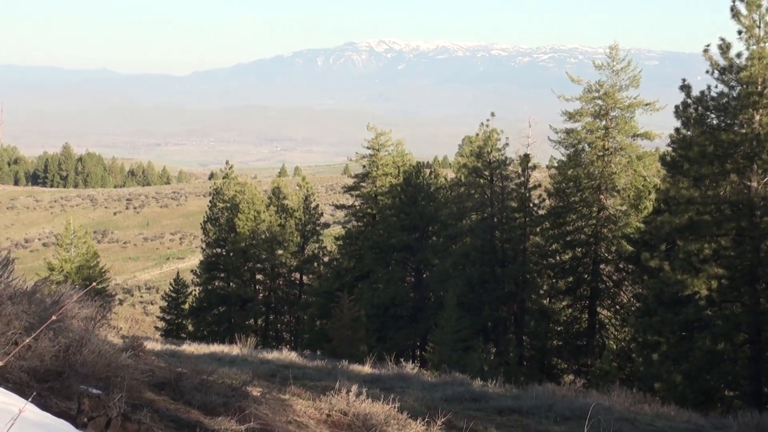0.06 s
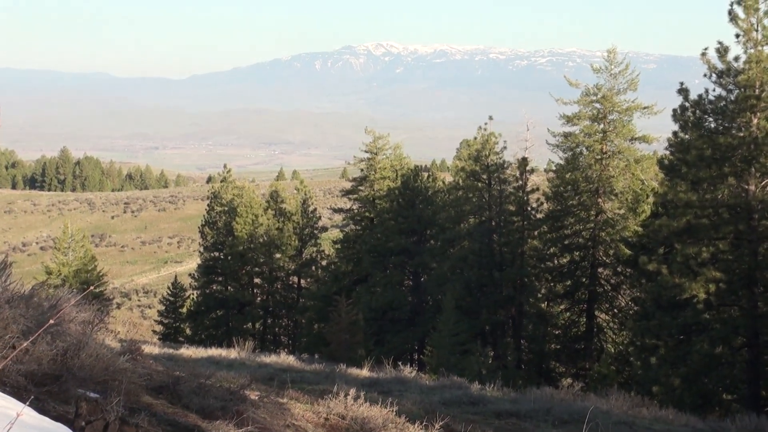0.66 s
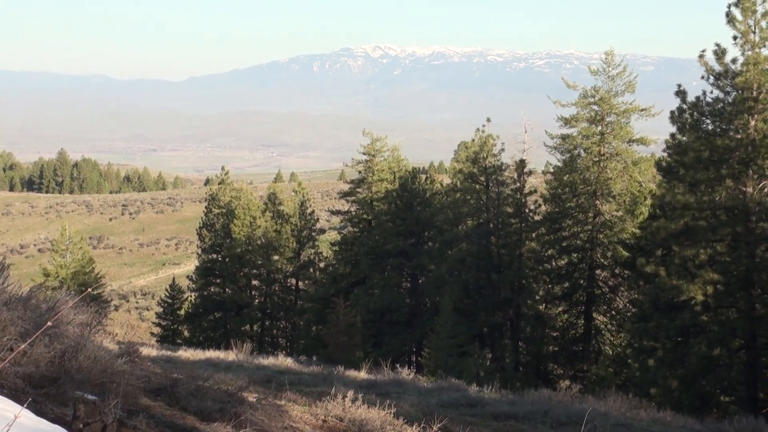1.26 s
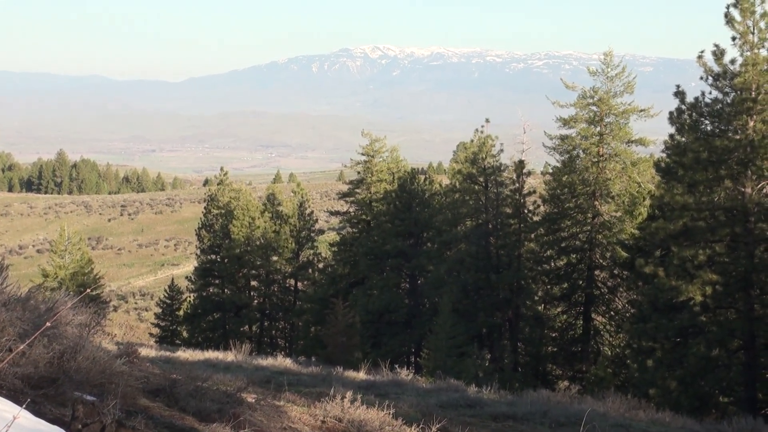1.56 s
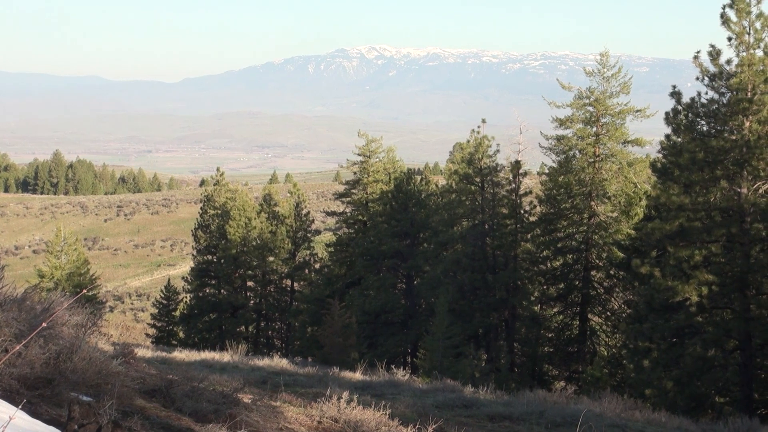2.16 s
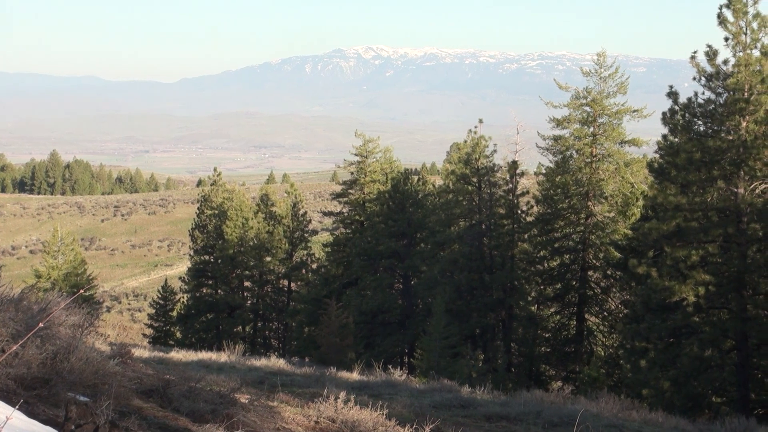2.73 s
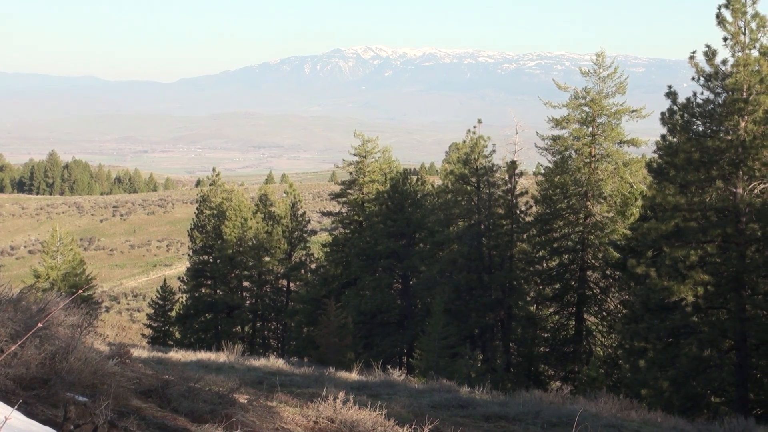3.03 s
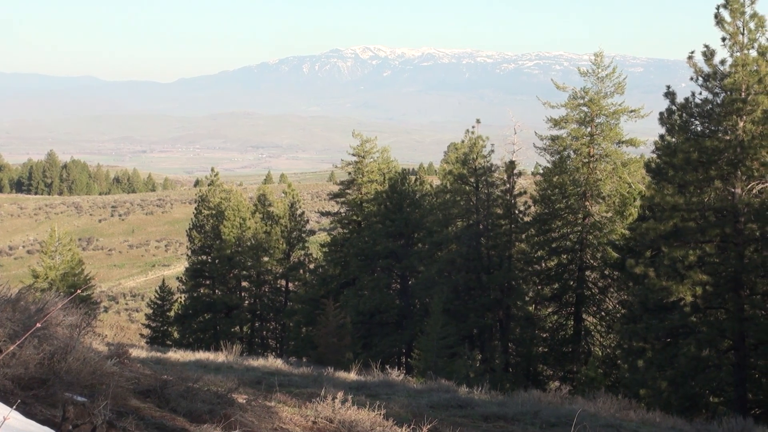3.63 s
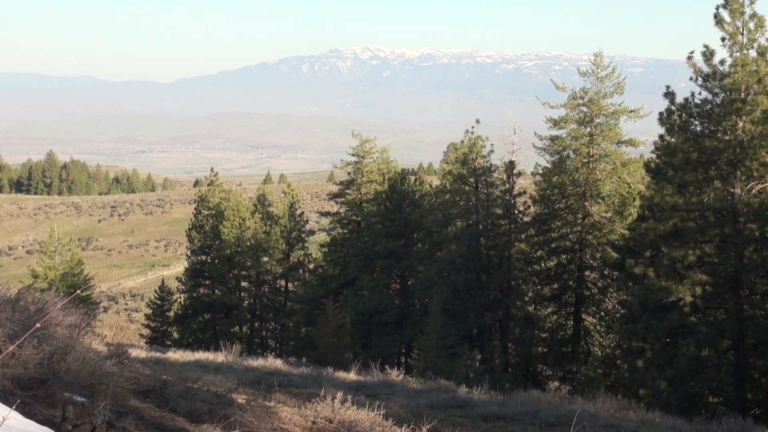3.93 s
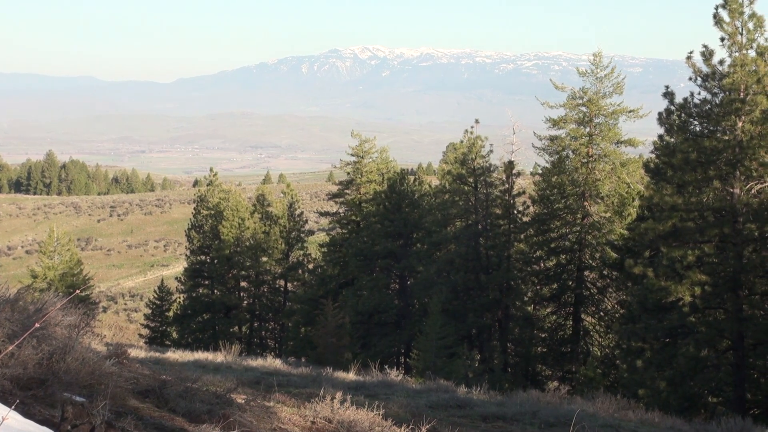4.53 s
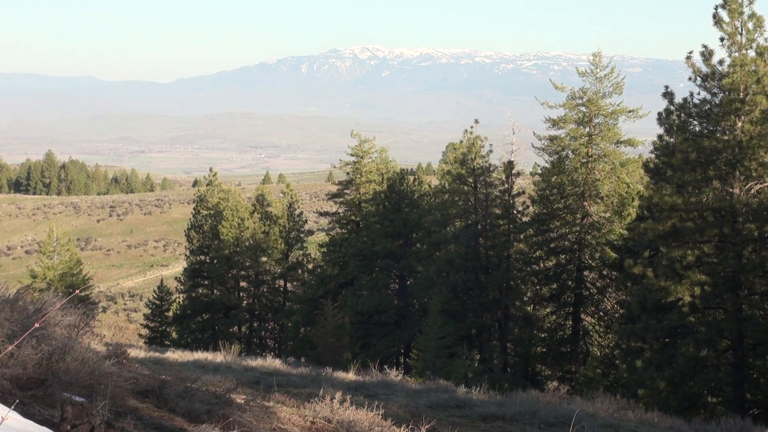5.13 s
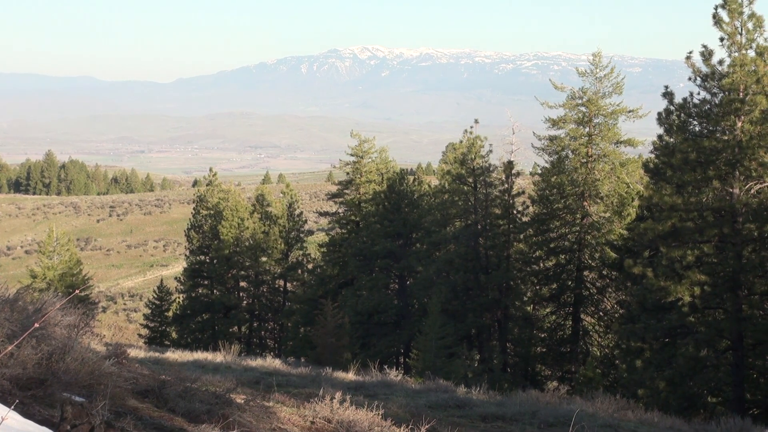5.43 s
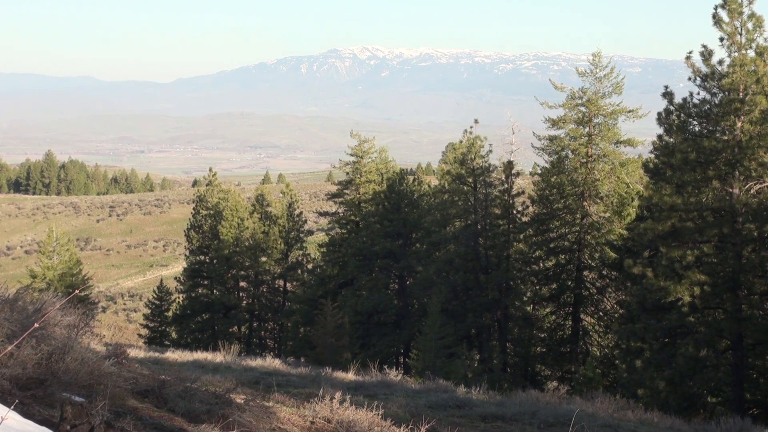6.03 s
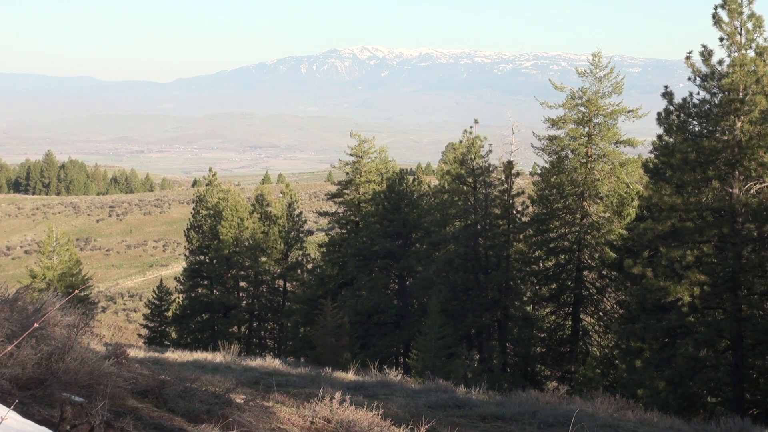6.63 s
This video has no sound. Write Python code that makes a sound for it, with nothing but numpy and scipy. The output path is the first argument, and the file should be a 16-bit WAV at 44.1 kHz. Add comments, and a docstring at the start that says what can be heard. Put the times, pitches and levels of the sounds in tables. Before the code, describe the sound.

Two distant wild turkeys gobble one after the other while small birds whistle and chirp, with low wind rumble and handling knocks on the microphone.

```python
"""Two wild turkeys gobble on a wooded hillside, the second deeper among the trees.
Each gobble is a fast rattle of high yelps and low notes, scattered into echoes by the trunks.
A small songbird whistles two phrases of falling notes, and others chirp farther off.
A gust rumbles on the microphone and dies; light handling knocks, ticks and scuffs
sound over quiet air and hiss."""
import sys
import numpy as np
from scipy import signal
from scipy.fft import rfft, irfft
from scipy.io import wavfile
from scipy.ndimage import uniform_filter1d

SR = 44100
rng = np.random.default_rng(int(sys.argv[2]) if len(sys.argv) > 2 else 0)


def generate_wav(sig):
    """Save sig (samples, or channels by samples) to the path in sys.argv[1] as 16-bit PCM at SR."""
    pcm = np.round(np.clip(np.atleast_2d(sig).T, -1, 1) * 32767).astype(np.int16)
    wavfile.write(sys.argv[1], SR, pcm)


N = 303849
TIME = np.arange(N) / SR

# The near gobble's syllables. Each row: start in seconds, length in seconds, low note's level in dB,
# its slide as a share of its pitch (minus falls), yelp's level in dB, yelp's pitch in Hz.
SYLLABLES = [(4.13, 0.046, -49.5, 0.021, -56, 1196), (4.17, .044, -40.5, 0.0027, -52, 1270),
             (4.217, .02, -40.5, -0.084, -45.5, 1314), (4.24, 0.02, -54, 0.039, -55, 1445),
             (4.263, .036, -45.5, -0.099, -60, 1260), (4.328, 0.022, -44.5, -0.11, -52.5, 1180),
             (4.371, 0.021, -47.5, -0.024, -54, 1230), (4.392, .032, -43, 0.061, -57, 1394),
             (4.426, 0.034, -45, 0.075, -56, 1270), (4.475, .013, -47.5, -.12, -62, 1130),
             (4.503, 0.017, -48.5, -0.098, -61, 1120), (4.536, 0.03, -48.5, -0.082, -55, 1120),
             (4.591, .018, -56, -.02, -51, 1150), (4.623, 0.035, -42.5, 0.011, -52.5, 1190),
             (4.657, 0.023, -50, -0.032, -67, 1150), (4.721, 0.028, -48, 0.05, -53.5, 1080),
             (4.764, .032, -50, -0.015, -52.5, 1145), (4.801, 0.069, -49, -.02, -67, 1120),
             (4.924, 0.017, -49.5, -0.097, -56, 1057), (4.992, 0.059, -53, -0.035, -68, 1060)]


def near_turkey(yelp_lead_s=.014, yelp_rise=.064, lift_per_db=.003, rasp_db=-11):
    """A sinking rattle of yelps that break into low notes; air torn in the throat makes it hoarse."""
    voice = np.zeros(N)
    starts, _, low_dbs = np.transpose(SYLLABLES)[:3]
    for start, length, low_db, glide, yelp_db, yelp_hz in SYLLABLES:
        effort = 1 + lift_per_db * (low_db - low_dbs.mean())  # a louder note is pushed higher
        low_hz = np.interp(start, starts[[0, -1]], (690, 596)) * effort
        yelp = note(length, yelp_hz * (1 - yelp_rise), yelp_hz * (1 + yelp_rise), arch_hz=45, rough=.043)
        low = note(length, low_hz * (1 - glide), low_hz * (1 + glide),
                   arch_hz=45, rough=.043, overtone_db=-23)
        add(voice, start - yelp_lead_s, amp(yelp_db) * yelp)
        add(voice, start, amp(low_db) * low)
    puffs = np.maximum(voice, 0) * rng.standard_normal(N)  # one puff of air in each vibration
    rasp = colour(puffs, [(350, -30), (600, 27.5), (800, 2), (950, 10),
                          (1300, 9), (1550, 6), (2200, 2), (4000, -26)])
    hoarse = amp(1.7) * (voice + amp(rasp_db) * rasp)
    return forest(hoarse, t60=.5, wet_db=-9)


# How loud the far gobble is. Each row: time in seconds, low notes' level in dB, high notes' level in dB.
FAR_LEVELS = [(5.33, -61, -79), (5.385, -64, -49.5), (5.43, -62, -64), (5.5, -60.5, -52),
              (5.65, -54.5, -50), (6.02, -52, -50.5), (6.3, -58.5, -52.5), (6.6, -65.5, -61)]


def far_turkey(notes_per_s=32, glide=.12, high_start_hz=1305, sag_hz=350):
    """A rattle through more trees: low notes slide down, high notes slide up, and echoes blur them."""
    times, low_db, high_db = np.transpose(FAR_LEVELS)
    first, last = times[[0, -1]]
    low, high, top = np.zeros((3, N))
    for k, (low_slip, high_slip, bend, stray) in enumerate(rng.uniform(-1, 1, (60, 4))):
        start = first + k / notes_per_s
        if start < last:
            spent = (start - first) / (last - first)
            # the pitch sinks ever faster as the bird runs out
            hz = (high_start_hz - sag_hz * spent ** 1.7) * (1 + .059 * stray)
            low_hz = np.interp(start, [first, last], [675, 630]) * (1 + .05 * bend)
            add(low, start + .00822 * low_slip,
                note(.0216, low_hz * (1 + glide), low_hz * (1 - glide), rough=.039))
            add(high, start + .0073 * high_slip,
                note(.028, hz * (1 - glide), hz * (1 + glide), rough=.032))
            add(top, start + .008 * low_slip, note(.0264, low_hz * 2.6, low_hz * 2.9, rough=.063))
    out = np.zeros((2, N))
    fade = np.interp(TIME, [last, last + .23], [1, 0])
    for voice, db in ((low, low_db), (high, high_db), (top, low_db - 6.5)):
        scattered = forest(voice, t60=.55, wet_db=2)
        strength = np.sqrt(abs(uniform_filter1d(scattered[0] ** 2, size=5000)) + .022)
        out += scattered / strength * amp(np.interp(TIME, times, db)) * fade
    return out


# The whistled notes. Each row: start in seconds, length in seconds, pitch in Hz,
# dip in pitch during the note in Hz (minus bends up), level in dB.
SONG_NOTES = [(.45, 0.35, 4545, 112, -53), (0.884, 0.36, 4356, 105, -53.5), (1.355, 0.16, 3610, 8.5, -56),
              (1.582, 0.33, 3605, -52.5, -55), (4.08, 0.29, 4515, 87.5, -57),
              (4.505, .35, 4330, 97.5, -56.5), (4.973, 0.34, 4277, 74, -51.5),
              (5.425, 0.17, 3590, -0.5, -57.5), (5.656, 0.3, 3605, -60, -54.5)]


def songbird(attack_s=.048, release_s=.025, drift_hz=-14, swell_db_per_hz=.04):
    """Pure held whistles that bend away from their pitch and back, louder where they dip lower."""
    out = np.zeros(N)
    for start, length, hz, dip_hz, db in SONG_NOTES:
        progress = np.linspace(0, 1, int(length * SR))
        scoop = np.sin(np.pi * progress ** .666)
        pitch = hz - dip_hz * scoop + drift_hz * progress + 9 * waver(len(progress), 91.6)
        fade = np.minimum(1, length * np.minimum(progress / attack_s, (1 - progress) / release_s))
        swell_db = swell_db_per_hz * dip_hz * (scoop - scoop.mean())
        level = fade * amp(db + swell_db + 2.4 * waver(len(progress), 34.3))
        add(out, start, level * unit(np.sin(2 * np.pi * np.cumsum(pitch) / SR)))
    return forest(out, t60=.8, wet_db=-9.5)


# One small bird's chirps. Each row: start in seconds, level in dB.
CHIRPS = [(2.072, -55.5), (2.215, -51), (2.347, -52), (2.488, -53), (2.566, -54.5)]
# Short, nearly steady pips. Each row: start in seconds, pitch in Hz, level in dB.
PIPS = [(1.158, 3270, -57.5), (2.66, 3930, -62), (2.896, 3605, -54), (3.092, 3620, -56.5),
        (3.928, 4600, -61.5)]
# Runs of distant twittering. Each row: start in seconds, length in seconds, pitch in Hz, level in dB.
TWITTER_RUNS = [(0.132, .2, 2690, -59.5), (0.753, 0.33, 2773, -58), (1.22, 0.15, 3150, -62.5),
                (2.605, 0.29, 2970, -63.5), (3.581, .1, 2760, -63), (3.698, .13, 2860, -60),
                (3.885, .11, 2650, -60.5), (4.12, .12, 2960, -62.5), (4.359, 0.24, 2647, -61),
                (4.99, 0.4, 2746, -60)]


def small_birds(notes_per_s=36, accent_db=8, accent_s=.041):
    """Arched chirps and pips, and runs of quick sliding notes that blur together deep in the wood."""
    near, far = np.zeros((2, N))
    for start, db in CHIRPS:
        add(near, start, amp(db) * note(.0303, start_hz=2810, end_hz=2810, arch_hz=400, rough=.011))
    for start, hz, db in PIPS:
        add(near, start, amp(db) * note(.052, hz, hz, arch_hz=30, rough=.012))
    for start, length, hz, db in TWITTER_RUNS:
        for k, (from_hz, to_hz) in enumerate(hz * (1 + .077 * rng.standard_normal((24, 2)))):
            delay = k / notes_per_s
            if delay < length:
                level = amp(db + accent_db * np.exp(-delay / accent_s))  # a run opens louder
                add(far, start + delay, level * note(.0219, from_hz, to_hz, arch_hz=151, rough=.027))
    return forest(near, t60=.4, wet_db=-10) + forest(far, t60=.35, wet_db=2)


# The tone of the wind's slow swells and quick buffets. Each row: frequency in Hz, gain in dB.
SWELL_TONE = [(4, -16), (12, 1), (27, -1), (38, -15.5), (48, -23), (90, -66), (200, -100)]
BUFFET_TONE = [(20, -54), (40, -9), (55, -1.5), (70, 1.5), (80, -25), (92, -24.5), (200, -51), (500, -100)]
# The gusts. Each row: start in seconds, time held in seconds, swell level in dB, buffet level in dB.
GUSTS = [(0.028, 0.15, -18.5, -23), (0.23, 0.033, -13, -19), (0.447, .04, -27.5, -39),
         (.72, 0.58, -42, -61), (1.426, 0.048, -37, -41), (1.83, .36, -46, -68), (3.167, 0.17, -41.5, -68)]


def wind():
    """Swirls of air press on both sides of the microphone alike: swells linger, buffets die soon."""
    starts, holds, swell_dbs, buffet_dbs = np.transpose(GUSTS)
    out = np.zeros(N)
    for tone, dbs, calm_db, t60 in ((SWELL_TONE, swell_dbs, -48, .87),
                                    (BUFFET_TONE, buffet_dbs, -56, .36)):
        gusts = (amp(db) * gust(start, hold, t60) for start, hold, db in zip(starts, holds, dbs))
        power = amp(calm_db) ** 2 + sum(level ** 2 for level in gusts)
        swirls = unit(colour(rng.standard_normal(N), tone))
        strength = np.sqrt(signal.fftconvolve(swirls ** 2, np.hanning(SR // 4) * 8 / SR, "same") + .02)
        out += swirls / strength * np.sqrt(power)  # evened out first, so the gusts set the level
    return out


def gust(start, hold, t60, attack_s=.035):
    """One gust's strength: it rises quickly, holds, then drops 60 dB every t60 seconds."""
    rise = np.exp(np.minimum(TIME - start, 0) / attack_s)
    return rise * amp(-60 * np.maximum(TIME - start - hold, 0) / t60)


# Soft knocks. Each row: start in seconds, level in dB, pitch in Hz, amount of dull click (0 is none).
KNOCKS = [(.057, -27, 298, .2), (.184, -28, 265, 0.22), (.209, -35, 453, 0.44), (.594, -33, 530, 0.49),
          (.716, -37, 330, 0.82), (1.058, -36, 197, 0.5), (1.894, -29, 504, .2), (1.901, -18.5, 490, .22),
          (1.906, -21.5, 297, 0.27), (2.249, -38, 695, 1.3), (2.318, -20.5, 235, 0.42),
          (2.419, -27.5, 970, 1.1), (2.573, -31, 322, 1.6), (3.165, -37.5, 655, .9),
          (3.554, -31.5, 490, .9), (3.558, -33, 760, 1.3), (4.158, -29.5, 470, .1), (4.787, -31, 414, 1),
          (5.45, -28, 483, .9), (6.518, -33.5, 342, .5)]
# Small dry ticks. Each row: start in seconds, level in dB, pitch in Hz.
TICKS = [(1.978, -33.5, 2160), (5.297, -38, 6120), (5.482, -32.5, 6200), (5.995, -31, 5600),
         (5.995, -31.5, 7600), (6.085, -34, 2800), (6.845, -39, 5340)]
# Brief scuffs. Each row: start in seconds, length in seconds, low rub's level in dB, fizz level in dB.
SCUFFS = [(0.051, 0.31, -52, -76), (1.388, 0.093, -68, -58), (1.571, 0.67, -61.5, -61.5),
          (1.911, 0.074, -42.5, -53.5), (1.989, 0.109, -47.5, -63), (2.429, 0.16, -66, -60)]


def handling(knock_cycles=9.8, tick_cycles=53):
    """Knocks ring briefly under a dull click; ticks are tiny and bright; scuffs are grainy rubbing."""
    out, t = np.zeros(N), np.arange(SR // 8) / SR
    for start, db, hz, click_share in KNOCKS:
        noise = .23 * band(len(t), 300, 1430) * np.exp(-t / .0064)
        click = ring(1060, t60=.0048, attack_s=.000096) + noise
        add(out, start, amp(db) * (ring(hz, knock_cycles / hz, attack_s=.00045) + click_share * click))
    for start, db, hz in TICKS:
        t60 = tick_cycles / hz
        grit = .2 * band(len(t), hz * .85, hz * 1.15) * amp(-60 * t / t60)
        add(out, start, amp(db) * (ring(hz, t60, attack_s=2 / hz) + grit))
    for start, length, rub_db, fizz_db in SCUFFS:
        count = int(length * SR)
        stroke = unit(np.sin(np.pi * np.linspace(0, 1, count) ** .69) * amp(4.3 * waver(count, 192)))
        friction = amp(rub_db) * band(count, 124, 570) + amp(fizz_db) * band(count, 2530, 6500)
        add(out, start, stroke * friction)
    return out


# How loud the faint rumble is. Each row: time in seconds, level in dB.
RUMBLE_LEVELS = [(5.3, -78), (5.55, -55.5), (6.25, -51.5), (6.5, -59.5), (6.89, -63)]


def faint_rumble():
    """Soft, deep noise that swells near the end."""
    return amp(np.interp(TIME, *np.transpose(RUMBLE_LEVELS))) * band(N, 58, 100)


# The tone of the air and hiss. Each row: frequency in Hz, gain in dB.
AIR_TONE = [(47, -24), (80, -3), (173, -6.5), (202, -7.5), (236, -6.5), (409, -10.5), (621, -11.5),
            (678, -12), (1290, -13.5), (1370, -16), (2840, -17), (4130, -19.5), (15500, -24)]
# How wide the air sounds. Each row: frequency in Hz, gain in dB of the part that differs between ears.
AIR_WIDTH = [(40, 11), (130, -2.5), (300, -3), (700, -7), (1500, -13.5), (3000, -21), (5000, -8.5),
             (8000, -5.5), (15000, -4)]
# The breeze. Each row: time in seconds, boost to the air's lower tones in dB.
BREEZE = [(0, 2.5), (1.8, 4.5), (3.4, 3), (4.4, 1.46), (6.89, 0)]


def air(level_db=-50):
    """Soft open air, stirred by the breeze, under steady microphone hiss."""
    middle, side = (unit(colour(noise, AIR_TONE)) for noise in rng.standard_normal((2, N)))
    side = colour(side, AIR_WIDTH)
    low = signal.sosfiltfilt(signal.butter(1, 1500, fs=SR, output="sos"), middle)
    boost_db = np.interp(TIME, *np.transpose(BREEZE)) + .5 * waver(N, 9)
    middle = middle + low * (amp(boost_db) - 1)
    return amp(level_db) * np.array([middle + side, middle - side])


def note(length, start_hz, end_hz, arch_hz=0, rough=0, overtone_db=-60):
    """One note from a bird's voice box: an arched, slightly shaky slide with a weak octave above."""
    count = max(int(length * SR), 64)
    progress = np.linspace(0, 1, count)
    hz = start_hz + (end_hz - start_hz) * progress + arch_hz * (np.sin(np.pi * progress) - np.pi / 4)
    phase = 2 * np.pi * np.cumsum(hz * (1 + rough * waver(count, 348))) / SR
    tone = np.sin(phase) + amp(overtone_db) * np.sin(2 * phase)
    fade = abs(np.sin(np.pi * progress ** .96)) ** .47
    return unit(tone * fade * (1 + 5 * rough * waver(count, 163)))


def forest(call, t60, wet_db):
    """Trunks and slope scatter a call into echoes, wet_db louder than it, nearly alike in both ears."""
    t = np.arange(SR) / SR
    echoes = rng.standard_normal((2, SR)) * (rng.random((2, SR)) < 2000 / SR)
    echoes *= amp(-60 * t / t60) * (t > .006)
    echoes /= np.linalg.norm(echoes, axis=1, keepdims=True)
    middle, side = signal.fftconvolve(call[None], echoes, axes=1)[:, :N]
    tail = np.array([middle + .024 * side, middle - .022 * side])
    return (call + amp(wet_db) * tail) / np.hypot(1, amp(wet_db))


def ring(hz, t60, attack_s):
    """One vibration that starts softly and drops 60 dB in t60 seconds."""
    t = np.arange(SR // 8) / SR
    return np.sin(2 * np.pi * hz * t) * amp(-60 * t / t60) * (1 - np.exp(-t / attack_s))


def amp(db):
    """Turns decibels into a gain."""
    return 10 ** (np.asarray(db) / 20)


def unit(sound):
    """Scales a sound to an average strength (rms) of 1."""
    return sound / np.sqrt(np.mean(sound ** 2) + 1e-20)


def add(mix, start, sound):
    """Lays a sound into the mix at a start time in seconds."""
    part = mix[max(round(start * SR), 0):][:len(sound)]
    part += sound[:len(part)]


def colour(sound, points):
    """Shapes a sound's tone along a curve of (Hz, dB) points."""
    hz, db = np.transpose(points)
    gain_db = np.interp(np.log(np.fft.rfftfreq(len(sound), 1 / SR) + 1), np.log(hz), db)
    return irfft(rfft(sound) * amp(gain_db), len(sound))


def band(count, low_hz, high_hz):
    """Noise of strength 1 between two frequencies."""
    edges = np.clip([low_hz, high_hz], 1, SR / 2 - 1)
    sections = signal.butter(3, edges, "band", fs=SR, output="sos")
    return unit(signal.sosfilt(sections, rng.standard_normal(count)))


def waver(count, rate_hz):
    """A random wobble of about size 1 that turns rate_hz times a second."""
    return np.interp(np.arange(count) * rate_hz / SR, np.arange(1024), rng.standard_normal(1024))


def scene():
    """Birds on the hillside, air, and the sounds at the microphone."""
    birds = near_turkey() + far_turkey() + songbird() + small_birds()
    return birds + air() + handling() + wind() + faint_rumble()


def record(dry, cutoff_hz=15800, fade_s=.004):
    """Fades both ends and cuts the highest treble."""
    fade = np.minimum(1, np.minimum(TIME, TIME[::-1]) / fade_s)
    treble_cut = signal.firwin(801, cutoff_hz, window=("kaiser", 9), fs=SR)
    return signal.oaconvolve(dry * fade, treble_cut[None], "same")


dry = scene()
out = record(dry)
generate_wav(out)
```